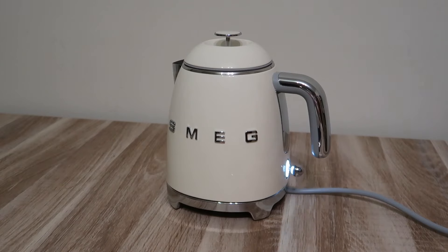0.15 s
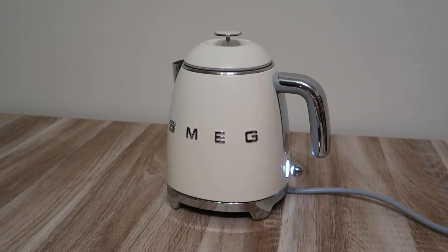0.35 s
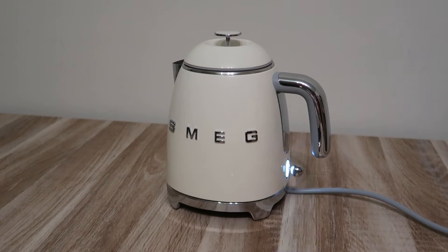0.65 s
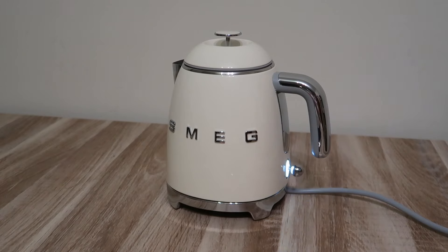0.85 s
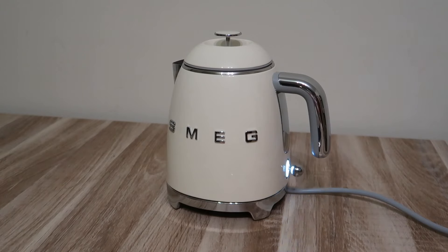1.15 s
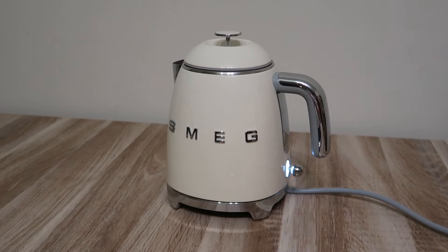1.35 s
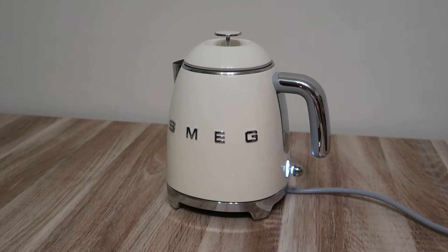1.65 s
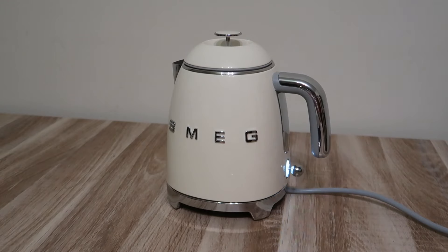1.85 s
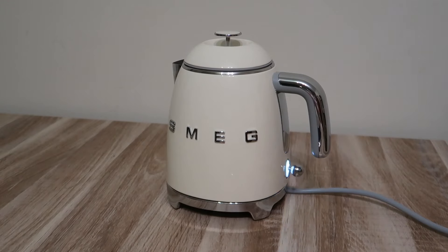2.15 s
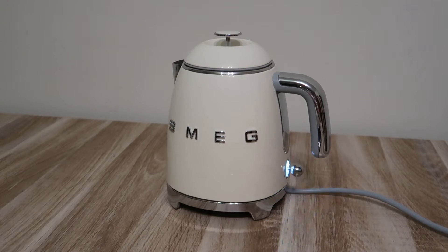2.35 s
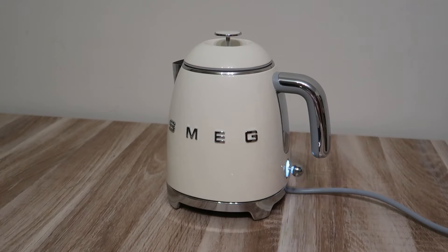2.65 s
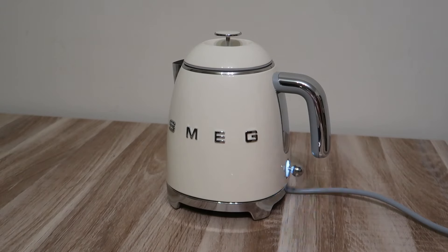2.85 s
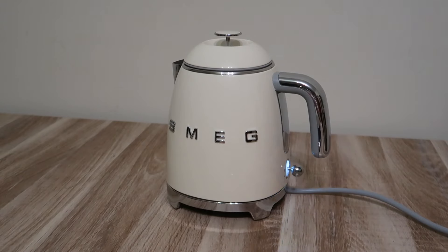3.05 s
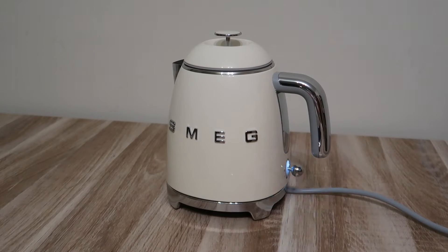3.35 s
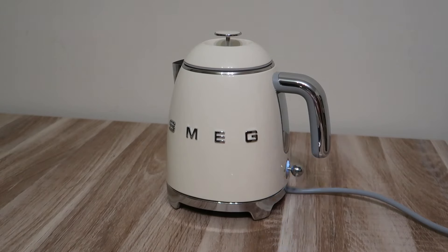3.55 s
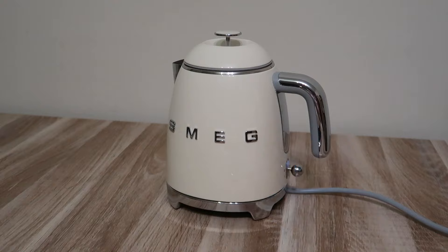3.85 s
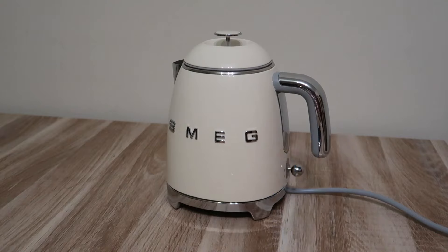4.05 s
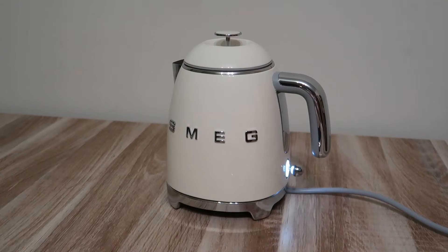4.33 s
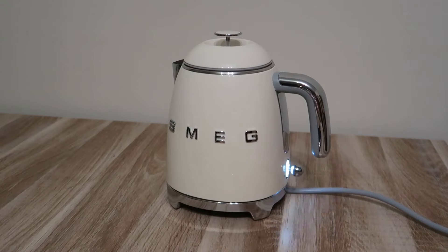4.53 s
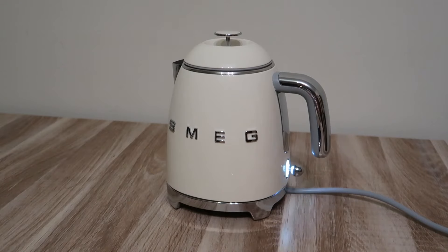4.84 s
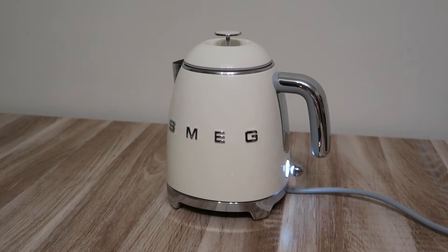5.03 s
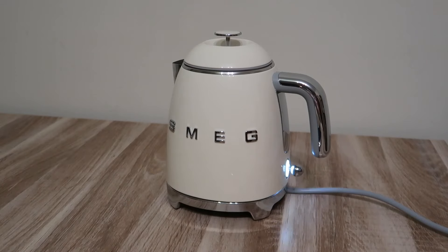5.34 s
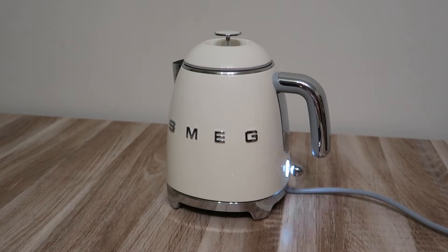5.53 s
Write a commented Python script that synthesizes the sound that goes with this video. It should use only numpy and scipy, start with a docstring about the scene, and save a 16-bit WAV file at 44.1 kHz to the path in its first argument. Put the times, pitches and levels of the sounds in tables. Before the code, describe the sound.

Mono room sound of a kettle starting to warm a little water. At first mostly deep swelling rumble, muffled rush and microphone hiss. Past two seconds, small pinging ticks appear, pause briefly, then return denser with fine sizzling spits and a very faint high whine. Dull low blips dot the later part. It never reaches a boil and ends while still building.

```python
"""A quiet room where an electric kettle starts to heat a little water, heard by one microphone.
Small steam bubbles collapse on the hot base and ring the steel shell, more often as heat grows: random
impulses through resonances, plus short sines for loud collapses and spits, a whistle and a fizz.
A low rumble, probably traffic and ventilation, fills the room's modes: shaped noise and swelling sines.
Dull low blips are sines of a few cycles; the microphone adds hiss."""
import sys
import numpy as np
from scipy import signal
from scipy.fft import rfft, irfft, next_fast_len
from scipy.io import wavfile
from scipy.ndimage import uniform_filter1d, map_coordinates

SR = 44100
rng = np.random.default_rng(int(sys.argv[2]) if len(sys.argv) > 2 else 0)


def generate_wav(signal):
    """Clip the signal to [-1, 1] and save it as 16-bit WAV at the path in sys.argv[1]."""
    frames = np.transpose(np.atleast_2d(signal))
    scaled = np.clip(frames, -1, 1) * 32767
    pcm = np.round(scaled).astype(np.int16)
    wavfile.write(sys.argv[1], SR, pcm)


N = 250929
TIME_S = np.arange(N) / SR

# Heating. Each row: time in seconds, heat 0-1.
HEAT = [(0, 0.1), (1.2, 0.16), (2.2, 0.43), (2.9, 0.3), (3.4, 0.58), (4.2, 0.73), (5, 0.8), (5.69, 0.91)]
# Loudest collapses, near the shell's main ring.
# Each row: start in seconds, nominal peak in dB, pitch in Hz, swell time in seconds.
LOUD_COLLAPSES = [(2.5461, -67, 1990, 0.0042), (2.6025, -47, 1996, 0.0033), (2.6214, -60, 1960, 0.0045),
                  (2.6798, -61, 1950, 0.005), (2.7526, -65, 2040, 0.005), (2.8724, -63, 1970, 0.0074),
                  (3.3383, -57, 2040, 0.005), (3.3574, -58, 2030, 0.0057), (3.4131, -60, 2030, 0.004),
                  (3.5229, -60, 2020, 0.0046), (3.5404, -56, 2050, 0.0045), (3.5564, -56, 2060, 0.0046),
                  (3.5944, -64, 2020, 0.005), (3.6616, -64, 1900, 0.0042), (3.692, -59, 2010, 0.0046),
                  (3.7329, -62, 2020, 0.005), (3.7494, -64, 2060, 0.0055), (3.8167, -66, 2020, 0.005),
                  (4.0093, -59, 2050, 0.0055), (4.1024, -55, 2050, 0.005), (4.3124, -66, 2140, 0.005),
                  (4.3304, -53, 2040, 0.0066), (4.4618, -60, 2120, 0.005), (4.5356, -55.5, 2050, 0.005),
                  (4.6673, -59, 2040, 0.005), (4.6914, -63, 2080, 0.0046), (4.9601, -55, 2040, 0.0036)]
FAINT_FLOOR = [(10, -60), (20000, -90)]  # under hum and drone: Hz, relative dB per Hz


def amp(db):
    """Amplitude ratio of a level in dB."""
    return 10 ** (np.asarray(db) / 20)


def unit(x):
    """x scaled to rms 1."""
    return x / np.sqrt(np.mean(x ** 2) + 1e-20)


def heat_curve():
    """Heat 0-1 at each sample."""
    time_s, heat = np.transpose(HEAT)
    return np.interp(TIME_S, time_s, heat)


def wobble(knots_per_s):
    """Smooth random curve: a spline through Gaussian knots."""
    knots = rng.standard_normal(int(N * knots_per_s / SR) + 4)
    return map_coordinates(knots, [np.arange(N) * knots_per_s / SR])


def bump(centre_s, half_s):
    """Half-cosine rise and fall, 0 to 1 to 0."""
    return np.cos(np.pi / 2 * np.clip((TIME_S - centre_s) / half_s, -1, 1))


def swells(rows):
    """Sum of smooth level changes in dB that come and go."""
    return sum(db * bump(centre_s, half_s) for centre_s, half_s, db in rows)


def pulse(u):
    """Envelope that peaks at 1 where u = 1, then decays."""
    return u * np.exp(1 - u)


def filtered(x, response):
    """x times a response of frequency, zero-padded."""
    m = next_fast_len(N + SR // 2)
    return irfft(rfft(x, m) * response(np.fft.rfftfreq(m, 1 / SR)), m)[:N]


def resonance(hz, centre_hz, width_hz):
    """One causal second-order resonance, gain 1 at its centre."""
    return 1j * hz * width_hz / (centre_hz ** 2 - hz ** 2 + 1j * hz * width_hz + 1e-9)


def noise(spectrum, modes=(), patchy_db=0):
    """Noise of rms 1: a broad spectrum, modes adding their power, time-frequency patches of random gain."""
    z = signal.stft(rng.standard_normal(N + 1024), nperseg=512)[2]
    field = uniform_filter1d(rng.standard_normal(z.shape), size=8, axis=0)
    field = uniform_filter1d(field, size=10, axis=1)
    x = signal.istft(z * amp(patchy_db * unit(field)), nperseg=512)[1][:N]
    knot_hz, knot_db = np.transpose(spectrum)

    def response(hz):
        broad = amp(np.interp(np.log(hz + 1), np.log(knot_hz + 1), knot_db)) ** 2
        # each resonance acts twice
        peaks = sum(np.abs(amp(db) * resonance(hz, c, w) ** 2) ** 2 for c, w, db in modes)
        return np.sqrt(broad + peaks)

    return unit(filtered(x, response))


def waver_db():
    """Slow random level wander of the deepest layers."""
    return 0.9 * wobble(2.88)


def deep_rumble():
    """Deepest noise layer, swelling and wavering."""
    # Each row: frequency in Hz, relative level in dB per Hz.
    spectrum = [(10, -7.5), (20, 5.5), (32, -0.5), (55, -13), (70, -4), (110, -70)]
    # Each row: centre in seconds, half-length in seconds, rise in dB.
    swell_rows = [(0.12, 0.22, 5), (4, 0.27, 3.5), (4.5, 0.76, 2), (5.4, .4, -1)]
    resting_db = -50
    return amp(resting_db + swells(swell_rows) + waver_db()) * noise(spectrum)


def hum():
    """A far engine's note and its octave, as two narrow noise bands."""
    # Each row: centre in Hz, resonance width in Hz, relative level in dB.
    modes = [(41.6, 18, -7.5), (83, 16, -8)]
    # Each row: centre in seconds, half-length in seconds, rise in dB.
    swell_rows = [(2.35, 0.3, 3.9), (3.5, 0.56, 1), (4.2, 0.26, 6.3), (5.4, 1, 5.1)]
    resting_db = -56
    return amp(resting_db + swells(swell_rows) + waver_db()) * noise(FAINT_FLOOR, modes)


def drone():
    """The room mode that wavers most, as one narrow noise band."""
    # Each row: centre in Hz, resonance width in Hz, relative level in dB.
    modes = [(128.6, 14.8, -2)]
    # Each row: centre in seconds, half-length in seconds, rise in dB.
    swell_rows = [(0.4, 0.61, 5.4), (2.5, 0.18, 8.4), (3.2, 0.35, 7.1), (3.95, 0.19, 7.7),
                  (4.65, 0.32, 8.4), (5.3, 0.34, 6)]
    resting_db = -54
    return amp(resting_db + swells(swell_rows) + waver_db()) * noise(FAINT_FLOOR, modes)


def rumble():
    """Low noise that lifts the room's modes, patchy and swelling."""
    # Each row: frequency in Hz, relative level in dB per Hz.
    spectrum = [(40, -48), (65, -14), (100, -12), (160, -4), (250, -2.5), (340, -13.5), (450, -18),
                (620, -29), (1000, -56)]
    # Room modes. Each row: centre in Hz, resonance width in Hz, relative level in dB.
    modes = [(209.6, 8.8, -2), (286.7, 46, 1), (300, 4.2, -5.5), (373.3, 27, -4.5), (414.5, 25, -10)]
    # Each row: centre in seconds, half-length in seconds, rise in dB.
    swell_rows = [(0.35, 0.38, 0.71), (3.1, 0.63, 1.9), (3.7, 0.22, 0.6), (4.98, 0.12, 1.4)]
    resting_db = -40.5
    level_db = resting_db + swells(swell_rows) + 0.96 * wobble(4.9)
    return amp(level_db) * noise(spectrum, modes, patchy_db=1.5)


def rush():
    """Lumpy noise in two bands that recedes, then holds; the low band grows again as the water warms."""
    # Low and high band. Each row: frequency in Hz, relative level in dB per Hz.
    low_spectrum = [(300, -28), (470, -1), (620, -6), (780, -11), (1000, -21.5), (1600, -57)]
    high_spectrum = [(500, -38), (800, -4), (1080, 2), (1400, -3.5), (1600, -9.5), (2200, -18), (2700, -29),
                     (5000, -70)]
    # Low and high band. Each row: centre in Hz, resonance width in Hz, relative level in dB.
    low_modes = [(510.5, 40, -2), (708, 46, -6.5)]
    high_modes = [(1330, 57, -3), (1690, 73, -10), (1877, 43, -9.5)]
    # High band. Each row: centre in seconds, half-length in seconds, rise in dB.
    swell_rows = [(0.9, .12, 0.9), (1.85, 0.13, 1.5)]
    low_start_db, high_start_db = -52, -56.5
    recede_db_per_s, recede_end_s = 2, 2.51
    warm_from_heat, warm_rise_db_per_heat = 0.45, 8.5
    lumps_db = 0.92 * wobble(45)  # common to both bands
    shared_db = lumps_db - recede_db_per_s * np.minimum(TIME_S, recede_end_s)
    warm_db = warm_rise_db_per_heat * np.clip(heat_curve() - warm_from_heat, 0, 1)
    low_db = low_start_db + shared_db + warm_db + 0.96 * wobble(45)
    high_db = high_start_db + shared_db + swells(swell_rows) + 0.5 * wobble(9.7)
    low = amp(low_db) * noise(low_spectrum, low_modes, patchy_db=0.27)
    high = amp(high_db) * noise(high_spectrum, high_modes, patchy_db=0.77)
    return low + high


def microphone():
    """Self-noise: shaped hiss whose whole band flickers slightly."""
    # Each row: frequency in Hz, relative level in dB per Hz.
    spectrum = [(800, -4.5), (2000, -1), (3000, 4), (5000, -0.5), (9000, -0.5), (13000, -2.5), (15800, -8)]
    level_db = -73.5 + 0.59 * wobble(32) + 1.0 * wobble(65)
    return amp(level_db) * noise(spectrum, patchy_db=0.3)


def simmer():
    """Random bubble-collapse impulses that wake with heat and flare around each loud collapse."""
    ripe_db, ripe_heat, wake_db_per_heat = -70.5, 0.53, 23
    flare_db, flare_s = 1, 0.037
    heat = heat_curve()
    flare = np.max([np.exp(-((TIME_S - at_s) / flare_s) ** 2) for at_s, *_ in LOUD_COLLAPSES], axis=0)
    level_db = ripe_db - wake_db_per_heat * np.clip(ripe_heat - heat, 0, 1) + flare_db * flare
    collapses_per_s = 400 * amp(12 * heat + 0.8 * wobble(16) + 4.0 * wobble(45))  # clustered
    chance, size = rng.random((2, N))
    return amp(level_db) * unit((chance < collapses_per_s / SR) * size ** -0.25)


def shell(collapses):
    """Collapses ring the steel shell's modes, each mode strongest at its own heat."""
    # Each row: mode in Hz, nominal t60 in seconds, level in dB, heat 0-1 of fullest excitation.
    modes = [(1962, 0.024, -6, 0.3), (2064, 0.03, -5.5, 0.42), (2140, 0.031, -6, 0.8),
             (2320, 0.025, -11, 0.91), (3020, 0.053, -19, 0.5), (3350, 0.013, -23, 0.3),
             (3560, 0.01, -16.5, 0.7), (4390, 0.031, -16, 1)]
    heat = heat_curve()
    out = np.zeros(N)
    for mode_hz, t60_s, db, ripe_heat in modes:
        width_hz = np.log(1000) / (np.pi * t60_s)
        below, above = np.clip(ripe_heat - heat, 0, 1), np.clip(heat - ripe_heat, 0, 1)
        woken = amp(db - 29 * below - 7.1 * above)
        sign = rng.choice([-1, 1], N)  # each collapse sits elsewhere on the mode's pattern
        drive = collapses * sign * np.sqrt(SR / (np.pi * width_hz))
        # twice: the ring swells softly
        out += filtered(woken * drive, lambda hz: resonance(hz, mode_hz, 1.73 * width_hz) ** 2)
    return out


def crackle(collapses):
    """The same collapses in bursts, straight through the spout: a broad band without shell ringing."""
    bursts = rng.choice([-1, 1], N) * collapses * amp(2.9 * wobble(30))
    return amp(-6.0) * filtered(bursts, lambda hz: resonance(hz, 5150, 4000) ** 2)


def sizzle():
    """Countless tiny bubbles blur into a fluttering noise fizz that follows the heat."""
    # Each row: frequency in Hz, relative level in dB per Hz.
    spectrum = [(2300, -30), (2900, -2), (3600, -2), (4500, -4), (7000, -7), (11000, -30)]
    # Each row: centre in Hz, resonance width in Hz, relative level in dB.
    modes = [(2960, 120, 2), (3560, 200, 3), (4400, 150, -5)]
    full_heat_db, wake_db_per_heat = -79.5, 16
    level_db = full_heat_db - wake_db_per_heat * (1 - heat_curve()) + 4.8 * wobble(40)
    return amp(level_db) * noise(spectrum, modes, patchy_db=3.0)


def spits(count=1400):
    """Free bubbles: each spit is seven short sines around one pitch; faint clusters crowd in over time."""
    # Loudest spits. Each row: time in seconds, level in dB (before a 19 dB cut), pitch in Hz, breadth 0-1.
    loud = [(2.1744, -56, 3100, 0.6), (2.301, -58, 3040, .3), (2.58, -54, 3650, 0.44),
            (3.662, -51, 3900, .9), (3.734, -55, 3100, .6), (3.82, -54, 3310, .8), (4.1061, -53, 4400, 0),
            (4.1061, -54, 3580, .1), (4.35, -55, 3580, .8), (4.38, -55, 3400, .15),
            (4.4618, -54, 3440, 0.1), (4.478, -55, 3700, .5), (4.669, -57, 3470, .5),
            (4.7494, -55, 3150, 0.35), (4.875, -56, 4550, .2), (4.905, -52, 3750, 0.1),
            (4.97, -57, 3670, 0.2), (5.0994, -56, 4800, .8), (5.145, -54, 3600, .3), (5.165, -55, 3670, .4),
            (5.224, -53, 3570, .15), (5.3802, -50, 4100, 0.5), (5.4694, -57, 3020, 0.3)]
    draw = rng.random((count, 4))
    cluster_s = (N / SR - 0.02) * rng.random(count // 4) ** 0.41
    faint_s = cluster_s[rng.integers(len(cluster_s), size=count)] + 0.012 * draw[:, 0]
    faint_db = -72 + 8 * draw[:, 1] ** 3
    faint_hz = 2800 * amp(6 * draw[:, 2] ** 1.6)
    faint = np.c_[faint_s, faint_db, faint_hz, 0.5 * draw[:, 3]]
    t = np.arange(768) / SR
    out = np.zeros(N + 1024)
    for s, level_db, hz, breadth in np.r_[loud, faint]:
        spread, late, phase = rng.random((3, 7, 1))
        spread = (np.arange(7)[:, None] + spread) / 7  # one pitch per seventh of the range
        pitch_hz = hz * amp(4.5 * np.clip(breadth, 0, 1) * (spread - spread.mean()))
        envelope = pulse(np.clip(t - 0.0108 * late, 0, 1) / 0.0015)
        bubbles = envelope * np.sin(2 * np.pi * (pitch_hz * t + phase))
        start = max(round((s - 0.003) * SR), 0)
        out[start:][:768] += amp(level_db - 19.0) * np.sum(bubbles, axis=0)
    return out[:N]


def tones():
    """Clean low sines that swell out of the rumble, each at its own pitch."""
    # Each row: centre in seconds, half-length in seconds, pitch in Hz, peak in dB.
    rows = [(3.073, 0.13, 127.6, -42.5), (3.167, 0.13, 83.6, -44), (3.29, 0.062, 123.7, -41.5),
            (3.498, 0.12, 82.9, -42), (3.298, 0.14, 41.3, -40), (3.6, 0.32, 42.2, -43),
            (3.95, 0.13, 37.9, -45), (2.468, 0.15, 81, -52), (3.07, 0.098, 283.5, -40.5),
            (3.793, 0.13, 86.8, -45.5), (4.295, 0.11, 37.3, -48), (4.54, 0.062, 33.6, -36),
            (4.71, 0.13, 130.2, -49), (5.323, 0.096, 128.4, -39.5)]
    out = np.zeros(N)
    for centre_s, half_s, hz, peak_db in rows:
        sine = np.sin(2 * np.pi * (hz * TIME_S + rng.random()))
        out += amp(peak_db) * bump(centre_s, half_s) * sine
    return out


def loud_collapses():
    """Each sings briefly at its own pitch, roughened by two close sines."""
    t = np.arange(4096) / SR
    out = np.zeros(N + 4096)
    for s, peak_db, pitch_hz, swell_s in LOUD_COLLAPSES:
        partials = np.zeros(4096)
        for off_hz, share in [(-2, 0.62), (-75, 0.25), (90, 0.15)]:
            partials += share * np.sin(2 * np.pi * ((pitch_hz + off_hz) * t + rng.random()))
        out[round(s * SR):][:4096] += amp(peak_db) * pulse(t / swell_s) * partials
    return out[:N]


def whistle():
    """Thin uneven line: a carrier whose pitch follows the heat, randomly modulated in quadrature."""
    cold_hz, rise_hz_per_heat = 1950, 129.8
    modulation_knots_per_s = 65  # sets the line's width
    from_s, fade_s = 2.6, 0.25
    pitch_hz = cold_hz + rise_hz_per_heat * heat_curve() + 12 * wobble(6)
    phase = 2 * np.pi * np.cumsum(pitch_hz) / SR
    line = wobble(modulation_knots_per_s) * np.sin(phase)
    line += wobble(modulation_knots_per_s) * np.cos(phase)
    fade = np.clip((TIME_S - from_s) / fade_s, 0, 1)
    return amp(-78.5 + 2.2 * wobble(14)) * fade * unit(line)


def blips():
    """Dull low blips, sines of a few cycles, probably from larger bubbles."""
    # Each row: start in seconds, nominal peak in dB, pitch in Hz.
    rows = [(4.235, -40, 605), (4.277, -53, 550), (4.388, -38.5, 590), (4.468, -43, 500),
            (4.502, -42.5, 623), (4.524, -38, 477), (4.822, -44, 604), (4.999, -37, 500), (5.476, -40, 475),
            (5.557, -41, 664)]
    t = np.arange(768) / SR
    out = np.zeros(N + 768)
    for s, peak_db, hz in rows:
        sine = np.sin(2 * np.pi * (hz * t + rng.random()))
        out[round(s * SR):][:768] += amp(peak_db) * pulse(t / 0.0014) * sine
    return out[:N]


def scene():
    """Room, kettle, blips and microphone noise, summed to one channel."""
    room = deep_rumble() + hum() + drone() + rumble() + rush() + tones()
    collapses = simmer()
    kettle = shell(collapses) + crackle(collapses) + loud_collapses()
    kettle += sizzle() + spits() + whistle()
    return (room + kettle + blips() + microphone())[None]


def record(dry):
    """Band limit: nothing is kept from 15750 Hz up."""
    return filtered(dry[0], lambda hz: hz < 15750)[None]


dry = scene()
out = record(dry)
generate_wav(out)
```